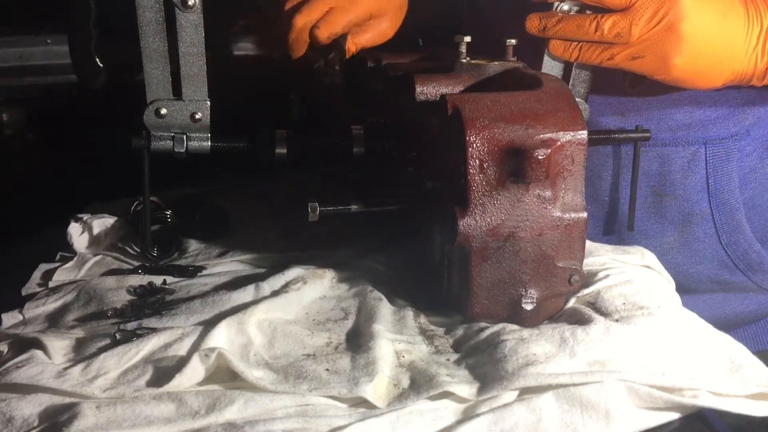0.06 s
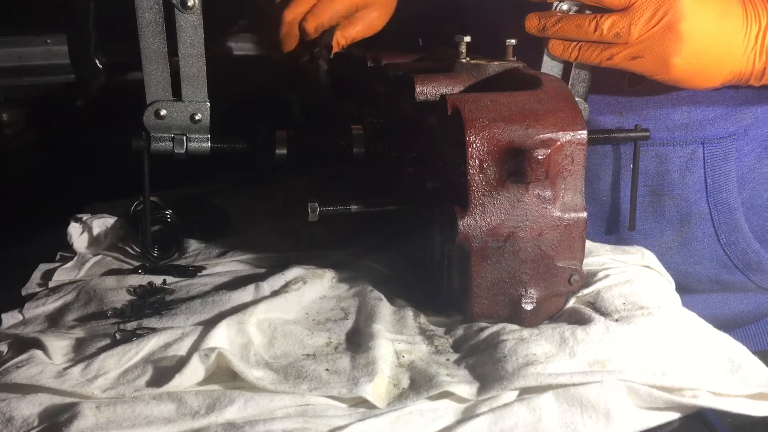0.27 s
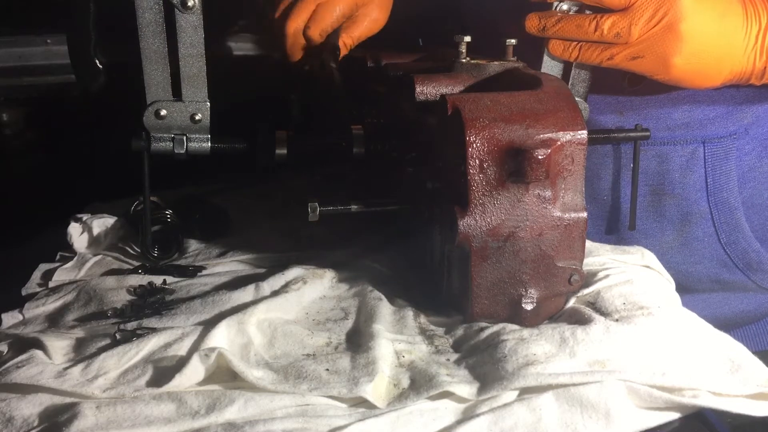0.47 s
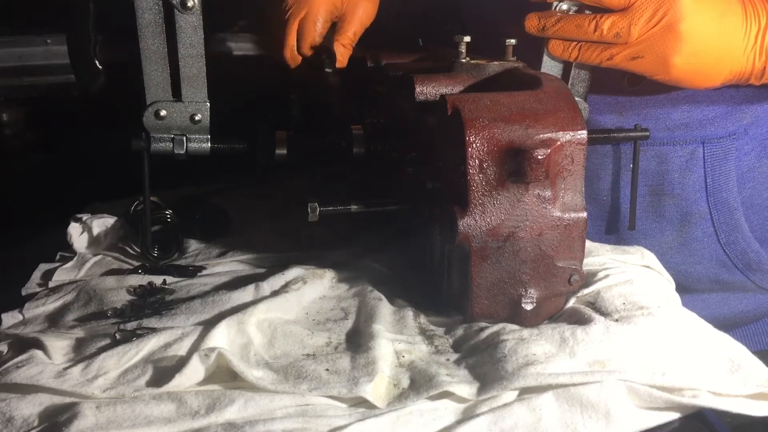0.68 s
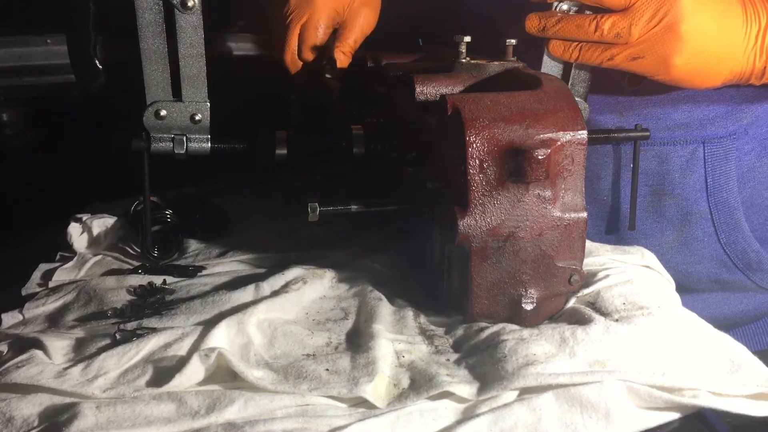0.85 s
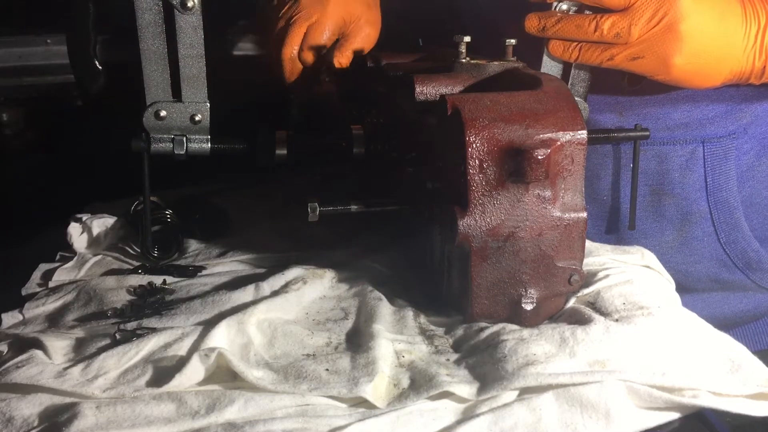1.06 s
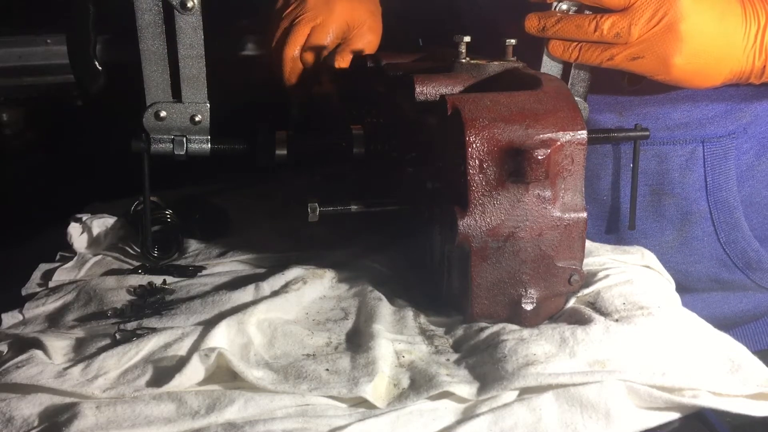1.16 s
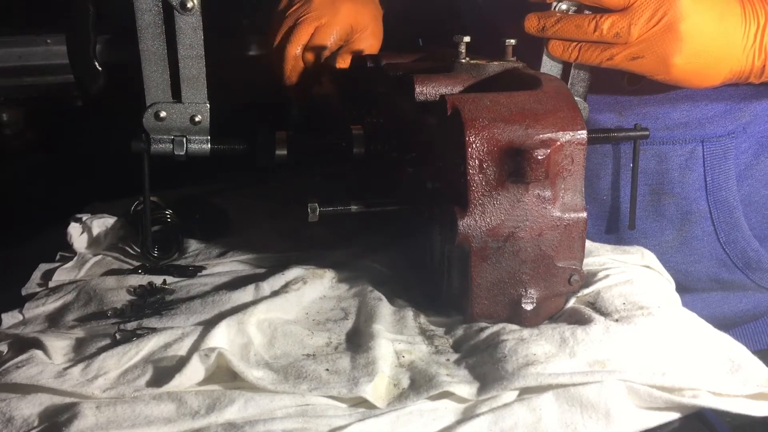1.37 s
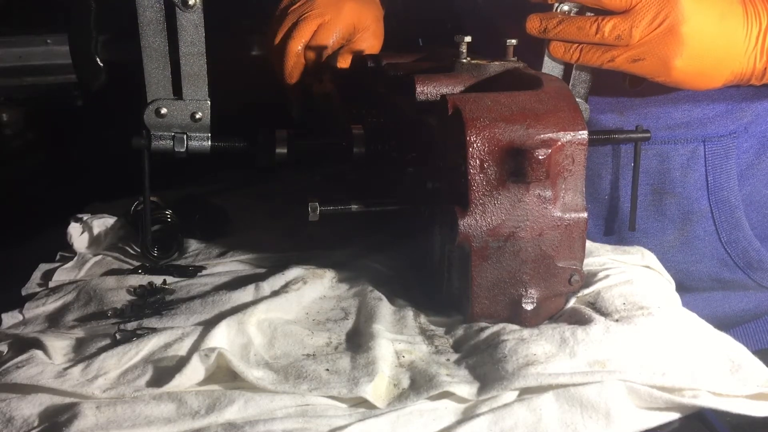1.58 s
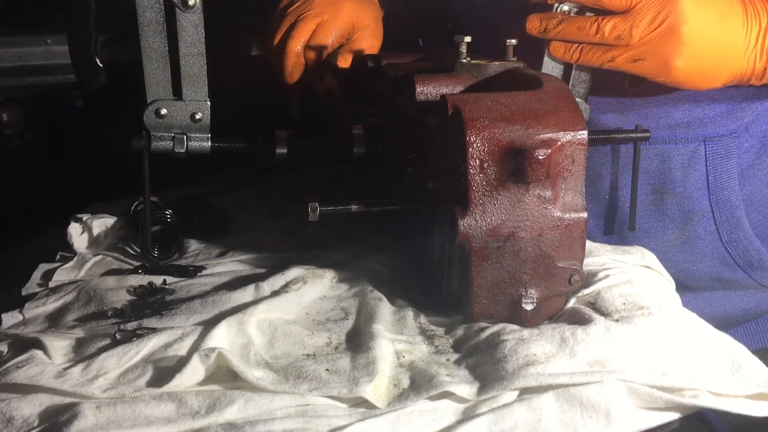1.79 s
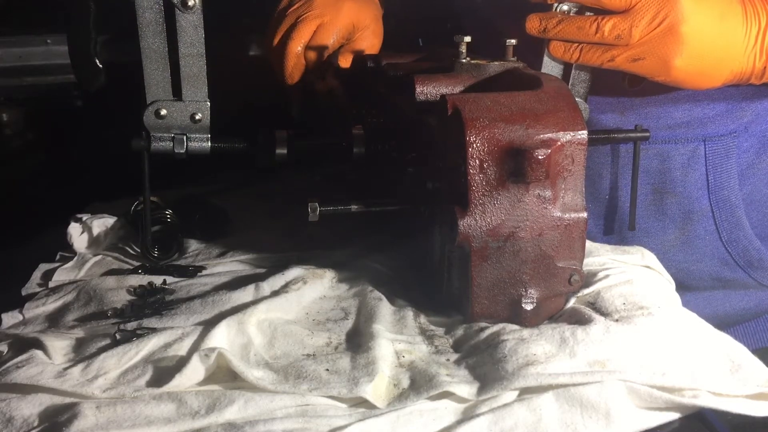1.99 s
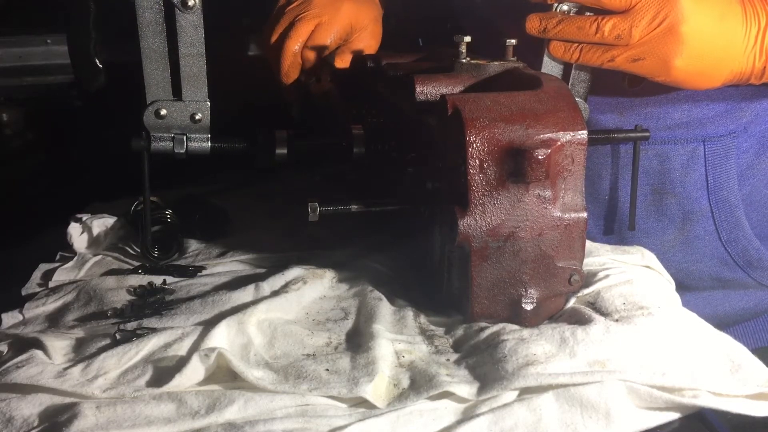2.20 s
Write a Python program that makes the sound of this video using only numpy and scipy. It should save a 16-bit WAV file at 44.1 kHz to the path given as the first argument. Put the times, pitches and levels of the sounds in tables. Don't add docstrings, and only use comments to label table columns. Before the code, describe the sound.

Sharp metallic clicks and short scrapes as a steel pick prods an engine part indoors

```python
import sys
import numpy as np
from scipy import signal
from scipy.fft import rfft, irfft, next_fast_len
from scipy.io import wavfile
from scipy.ndimage import map_coordinates

SR = 44100
rng = np.random.default_rng(int(sys.argv[2]) if len(sys.argv) > 2 else 0)


def to_linear_factor(level_db):
    exponent = np.asarray(level_db, float) / 20
    return 10 ** exponent


def wav_out(sig):
    wavfile.write(sys.argv[1], SR, np.round(np.clip(np.atleast_2d(sig).T, -1, 1) * 32767).astype(np.int16))


N = 99225


def unit(x):
    return x / np.sqrt(np.mean(x ** 2) + 1e-20)


def along(points, hz):
    f, value = np.transpose(points)
    return np.interp(np.log(hz + 1), np.log(f + 1), value)


def filtered(x, response):
    size = next_fast_len(N + SR // 2)
    spectrum = rfft(x, size) * response(np.fft.rfftfreq(size, 1 / SR))
    return irfft(spectrum, size)[:N]


def since(s):
    return np.maximum(np.arange(N) / SR - s, 0)


# f/Hz, level/dB (per Hz)
RUMBLE_COLOR = [(12, -56), (20, -44), (38, -3.5), (59, 0), (203, -10.5), (226, -10.5), (333, -21),
                (450, -24.5), (580, -52), (990, -120)]
# f/Hz, level/dB (per Hz)
HISS_COLOR = [(180, -38.5), (300, -0.5), (366, -8), (678, -8), (1010, -9), (1120, -6.5), (1210, -8.5),
              (4440, -13), (16000, -22)]


def air():
    def noise(color):
        return unit(filtered(rng.standard_normal(N), lambda f: to_linear_factor(along(color, f))))
    rumble_db, hiss_db = -68, -72
    return to_linear_factor(rumble_db) * noise(RUMBLE_COLOR) + to_linear_factor(hiss_db) * noise(HISS_COLOR)


def contacts(rows):
    snap_db = -1
    grit_hz, scrape_s = 4520, 0.034
    force = np.zeros(N)
    for s, db, rise, t60, hard_hz in rows:
        t = since(s)
        swell = np.minimum(t / rise, 1) ** 2
        fade = to_linear_factor(-60 * np.maximum(t - rise, 0) / t60)
        grit = fade * swell * rng.standard_normal(N)

        scrape = min(t60 / scrape_s, 1)
        push = np.zeros(N)
        push[round((s + rise) * SR)] = to_linear_factor(snap_db) * np.linalg.norm(grit) * np.sqrt(1 - scrape ** 2)

        def low(f):
            return 1 / ((1 + 1j * f / grit_hz) * (1 + 1j * f / hard_hz)) ** 2

        def high(f):
            return (1j * f / grit_hz) ** 2 * low(f)

        force += to_linear_factor(db) * (filtered(push + scrape * grit, low) + filtered(grit, high))
    return force


def body(peaks):
    broad_db = -18.5

    def response(f):
        h = to_linear_factor(broad_db) * 1j * f / (600 + 1j * f)
        for k, (center, width, db) in enumerate(peaks):
            peak = 1j * f * width / (center * center - f * f + 1j * f * width)
            h = h + (-1) ** k * to_linear_factor(db) * peak
        return h / np.sqrt(np.mean(np.abs(h) ** 2))
    return response


# f/Hz, level/dB, t60/s
SPRING_MODES = [(1570, -5, 0.053), (1778, -0.5, 0.23), (2174, -4.5, .14), (2464, -11.5, .13),
                (3360, -14.5, 0.33), (3700, -1.5, .16), (5685, -7, .1)]


def spring():
    buzz_hz, phase_shake = 110, 1.2
    t = np.arange(SR // 2) / SR

    def shake():
        return map_coordinates(rng.standard_normal(200), [t * buzz_hz])

    ring = np.zeros(len(t))
    for hz, db, t60 in SPRING_MODES:
        level = db + rng.normal(0, 2) + 3 * shake() - 60 * t / t60
        ring += to_linear_factor(level) * np.sin(2 * np.pi * hz * t + phase_shake * shake())
    return ring / np.linalg.norm(ring)


# f/Hz, t60/s
WALL_DECAY = [(150, 0.298), (500, 0.31), (1000, 0.32), (3000, 0.31), (6000, 0.29), (14000, 0.14)]


def walls():
    hz, t, z = signal.stft(rng.standard_normal(SR // 2), SR, nperseg=256)
    fade = to_linear_factor(-60 * t / along(WALL_DECAY, hz)[:, None])
    tail = signal.istft(z * fade, SR, nperseg=256)[1]
    return np.pad(tail / np.linalg.norm(tail), (150, 0))


# t/s, level/dB, rise/s, t60/s, hardness f/Hz
FIRST_SLIP = [
    (.1935, -38.5, 0.001, 0.097, 2500),
    (.196, -54.5, 0.0018, .09, 12080),
    (.2226, -9, 0.00088, .008, 12000),
    (.2308, -13.5, 0.00067, .012, 6000),
    (.236, -36.5, 0.0021, 0.058, 7420),
    (.2797, -28.5, 0.0015, .02, 14000),
]
SECOND_SLIP = [
    (.5995, -29, 0.0011, 0.0098, 12500),
    (.604, -30.5, 0.0014, 0.034, 6000),
    (.6135, -52.5, 0.00056, .02, 11800),
]
THIRD_SLIP = [
    (0.6635, -33, 0.0011, 0.024, 14000),
    (0.669, -30, 0.0018, 0.066, 4250),
    (0.683, -39, 0.008, 0.025, 3000),
    (0.7822, -51.5, .002, 0.026, 3000),
]
FOURTH_SLIP = [
    (.9021, -42.5, .001, 0.013, 14000),
    (0.905, -40.5, 0.00033, 0.059, 5940),
]
FIFTH_SLIP = [
    (1.191, -45.5, 0.0024, 0.07, 1300),
    (1.2635, -49, 0.0016, 0.056, 4000),
    (1.2703, -30.5, .0008, 0.015, 7650),
    (1.2725, -29.5, 0.0015, 0.023, 6600),
    (1.277, -38, 0.0016, 0.087, 5000),
]
LAST_SLIP = [
    (1.76, -57.5, .003, 0.074, 11700),
    (1.86, -41.5, 0.021, 0.15, 3000),
    (1.8809, -52, 0.003, 0.022, 6000),
    (1.8894, -56, 0.00095, 0.036, 12000),
    (1.896, -37, 0.0013, 0.095, 14000),
    (1.9032, -16, 0.00083, 0.027, 14000),
    (1.907, -32.5, 0.0011, 0.047, 14000),
]
# f/Hz, width f/Hz, level/dB
FIRST_SPOT = [(384, 60, -12), (1050, 69, -8.5), (1796, 155, -0.5), (2860, 267, 3.5), (4440, 160, 0),
              (5250, 290, 1.5), (8730, 2500, -7.5), (12850, 1670, -5.5)]
SECOND_SPOT = [(374, 23, -15), (986, 100, -13.5), (1660, 24, -9), (2090, 240, 0.5), (3000, 890, -10.5),
               (5470, 620, 0.5), (9670, 710, -7.5), (12300, 1000, -10.5)]
THIRD_SPOT = [(705, 340, -12.5), (1700, 99, -2.5), (2060, 270, 2), (2497, 67, 9.5), (3600, 610, 1.5),
              (5600, 1500, 2.5), (7090, 280, 5), (8700, 1300, -4)]
FOURTH_SPOT = [(890, 100, -22.5), (1800, 140, -3), (2170, 260, -2.5), (3250, 880, -2.5), (4440, 170, 0.5),
               (5600, 540, -3), (9300, 650, -3.5), (12490, 1660, -12)]
FIFTH_SPOT = [(421, 43, -6), (806, 86, -6), (1180, 150, -12.5), (2055, 100, -1), (2500, 180, -4.5),
              (4470, 1500, -3), (6050, 440, -0.5), (9800, 8700, -8.5)]
LAST_SPOT = [(385, 33, -16), (667, 64, -12), (1890, 330, -7), (2200, 450, -3.5), (3590, 390, 2),
             (5450, 430, 1), (9600, 1440, -10), (14000, 2850, -10)]
SPRING_LEVELS = [-19, -16, -19, -22, -30, -17]
WALL_LEVELS = [-8.5, -9, -14.5, -12.5, -13, -7]


def pick():
    slips = [FIRST_SLIP, SECOND_SLIP, THIRD_SLIP, FOURTH_SLIP, FIFTH_SLIP, LAST_SLIP]
    spots = [FIRST_SPOT, SECOND_SPOT, THIRD_SPOT, FOURTH_SPOT, FIFTH_SPOT, LAST_SPOT]
    out = np.zeros(N)
    for rows, peaks, spring_db, wall_db in zip(slips, spots, SPRING_LEVELS, WALL_LEVELS):
        force = contacts(rows)
        ring = signal.fftconvolve(force, spring())[:N]
        click = filtered(force, body(peaks)) + to_linear_factor(spring_db) * ring
        echo = signal.fftconvolve(click, walls())[:N]
        out += click + to_linear_factor(wall_db) * echo
    return out


# t/s,
# f/Hz, level/dB, swell/s, t60/s
BENCH_THUMPS = [(.226, 187.6, -32, 0.02, 0.18), (0.236, 117.3, -39.5, 0.0067, 0.26),
                (0.238, 255, -42.5, 0.012, 0.23), (0.328, 158.1, -45, 0.021, 0.26),
                (0.379, 55, -42, .015, 0.084), (0.56, 62, -45, 0.036, .15), (0.672, 228, -48, 0.02, 0.15),
                (1.905, 192.3, -52.5, 0.0027, 0.29), (.29, 83.3, -49, 0.03, 0.49),
                (1.989, 58.2, -46.5, 0.0099, 0.15), (1.194, 1115, -60.5, .004, 0.086),
                (1.193, 406, -64, 0.0034, 0.059), (1.767, 325, -64, 0.0088, 0.069)]


def bench():
    out = np.zeros(N)
    for s, hz, db, swell, t60 in BENCH_THUMPS:
        t = since(s)
        drift = map_coordinates(rng.standard_normal(100), [np.arange(N) / SR * 40])
        level = to_linear_factor(db - 60 * t / t60) * (1 - np.exp(-t / swell))
        out += level * np.sin(2 * np.pi * hz * t + 1.1 * drift)
    return out


def scene():
    return (air() + pick() + bench())[None]


def roll_off(x):
    return signal.sosfilt(signal.butter(12, 16830, fs=SR, output="sos"), x)


def record(dry):
    weak_hz, edge_hz, weak_db, top_hz = 15850, 60, -20, 16700

    def band(hz):
        weakening = (1 + np.tanh((hz - weak_hz) / edge_hz)) / 2
        return (hz < top_hz) * to_linear_factor(weak_db * weakening)

    mix = filtered(dry[0], band)[None]
    return roll_off(mix)


dry = scene()
out = record(dry)
wav_out(out)
```